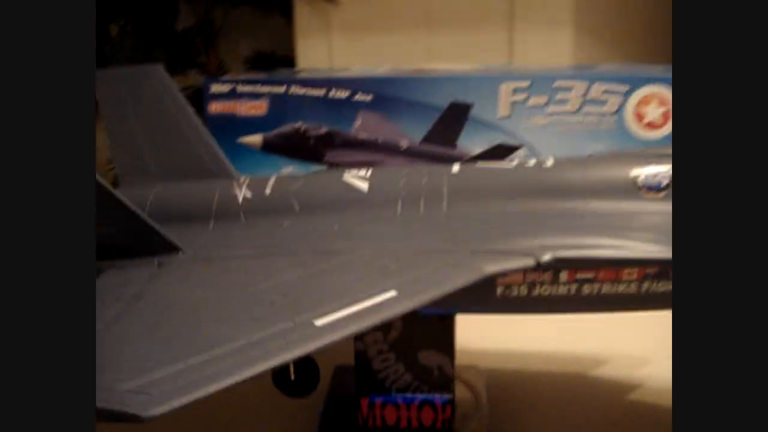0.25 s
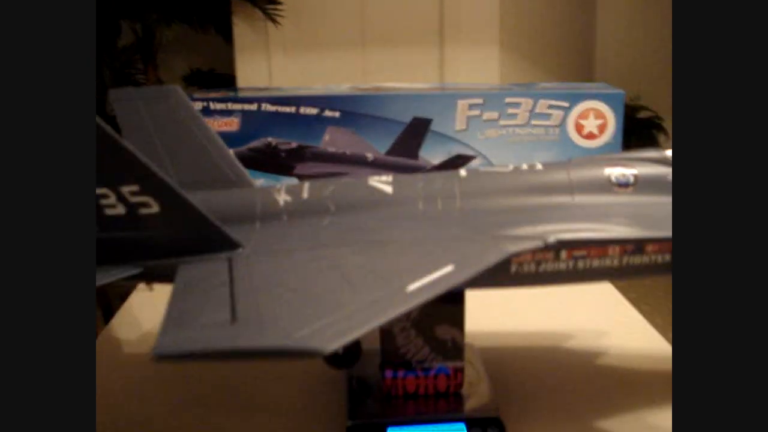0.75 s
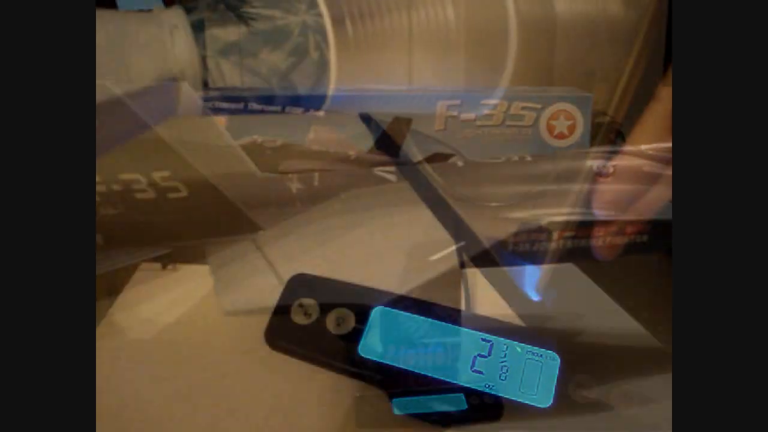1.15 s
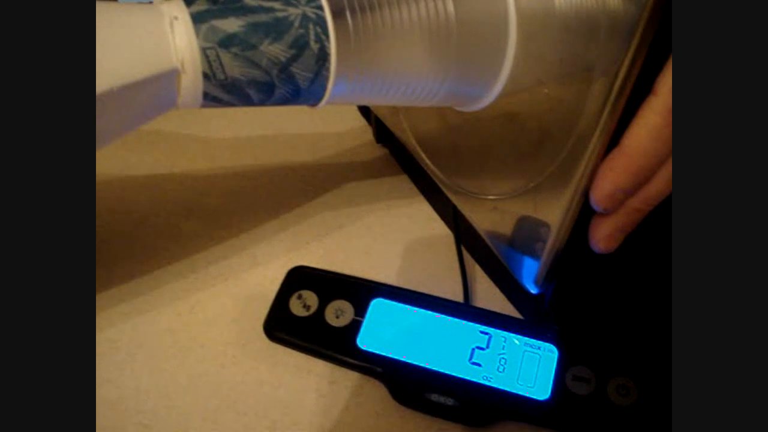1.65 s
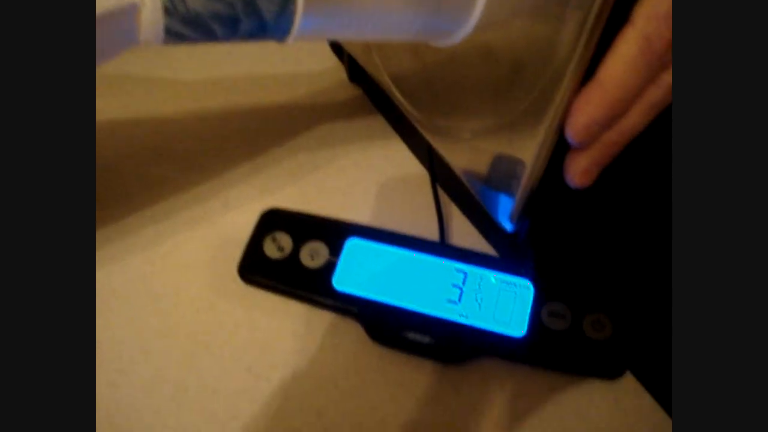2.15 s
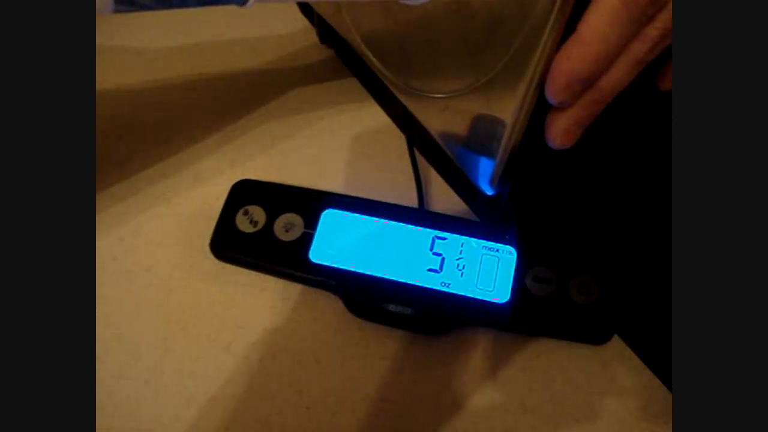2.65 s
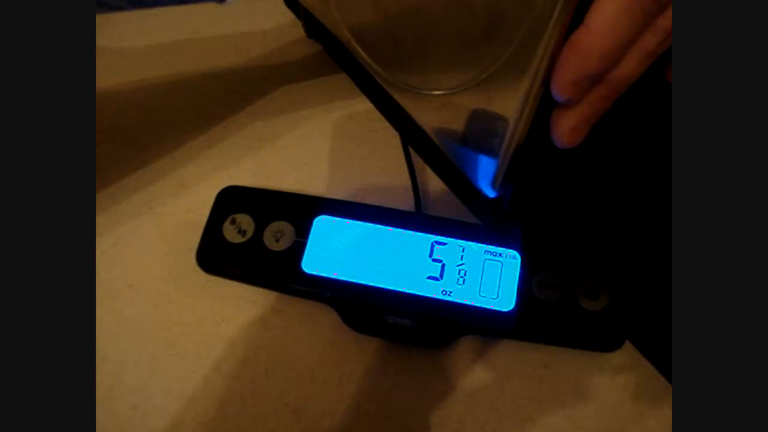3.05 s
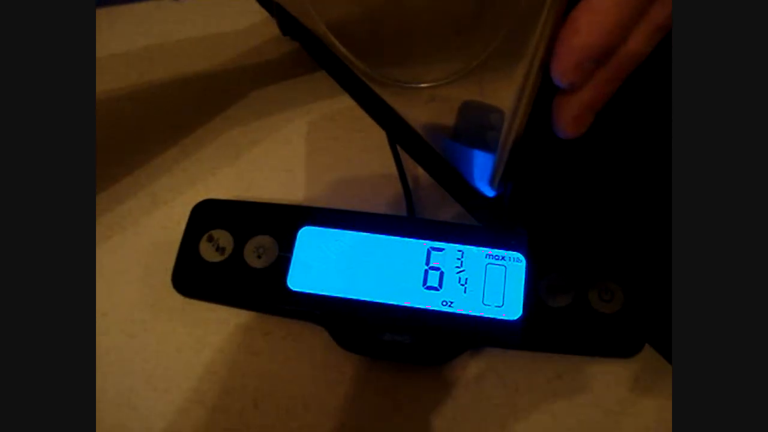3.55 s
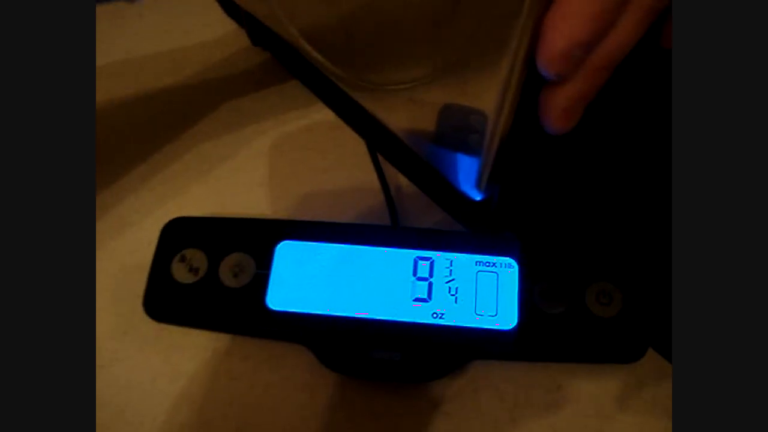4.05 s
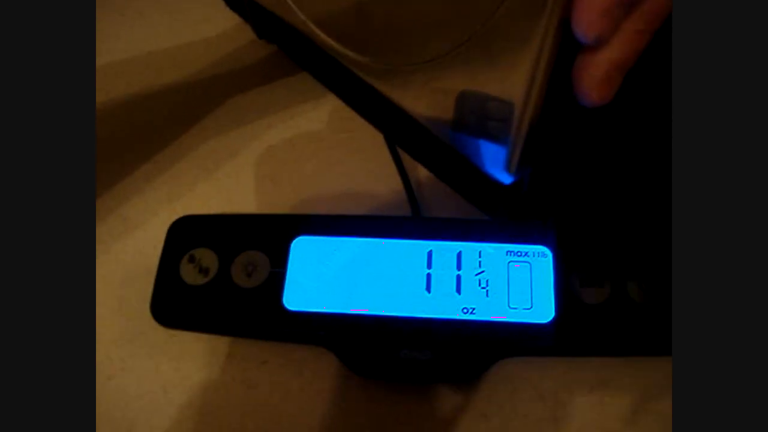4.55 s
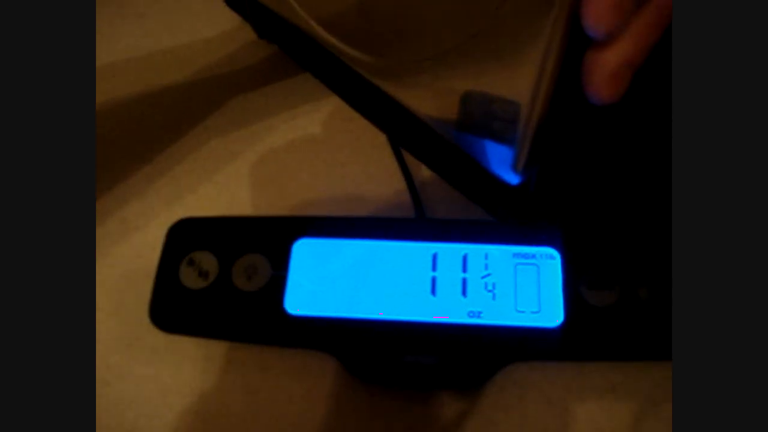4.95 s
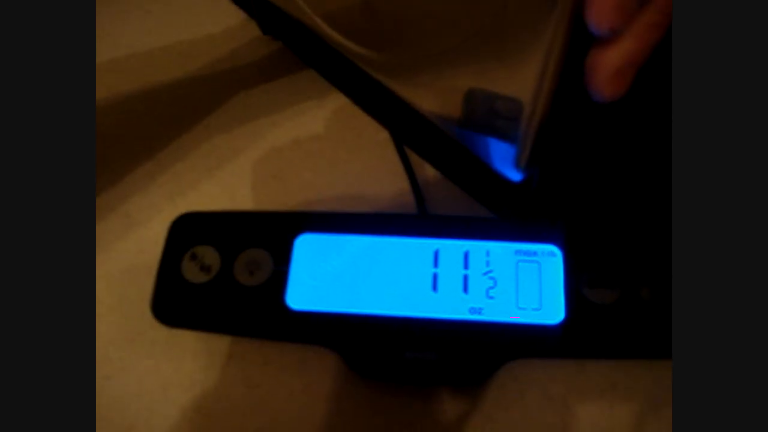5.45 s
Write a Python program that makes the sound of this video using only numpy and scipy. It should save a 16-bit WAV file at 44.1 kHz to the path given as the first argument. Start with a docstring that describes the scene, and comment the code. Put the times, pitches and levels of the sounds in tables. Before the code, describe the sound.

For the first 0.9 seconds there is quiet, slightly hollow room tone with a dozen tiny dry plastic ticks, mostly between 0.05 and 0.6 s, and a sharper downward-chirping snap at 0.4 s. More ticks near 0.9 s lead into a fade, with a soft low bump around 1.1 s, as an already running small electric ducted fan replaces the room by 1.5 s. A hum near 200 turns per second sits beneath a blade whine around 1.6 kHz and higher motor tones. It holds briefly, then climbs quickly from 1.8 to 2.5 s and continues in uneven steps, with another clear jump near 4.3 s and a last rise after 5.4 s, ending at 5.7 s over twice its starting pitch. Gusty roar, hiss and fine sizzle accompany it; the roar thins later. Faint fixed high tones come and go. Close, with slight room reflections, identical channels, little above 10 kHz.

```python
"""Indoors, close to a test stand that holds a small electric ducted fan; both channels carry the same sound.
A quiet room has a few handling ticks and one sharper click; then the running fan fades in and climbs in steps.
The rotor hums at its turning rate, blades and motor whine at multiples of it, and shaped noise makes the air.
Two thin high tones: one near 7.6 kHz that comes and goes, and one near 10 kHz only while the fan turns slowly."""
import sys
import numpy as np
from scipy import signal
from scipy.fft import rfft, irfft
from scipy.io import wavfile

SR = 44100
rng = np.random.default_rng(int(sys.argv[2]) if len(sys.argv) > 2 else 0)


def store_wav(level_fs):
    """Save 16-bit WAV to argv[1]."""
    pcm = np.round(np.clip(np.atleast_2d(level_fs), -1, 1) * 32767)
    wavfile.write(sys.argv[1], SR, pcm.T.astype(np.int16))


N = 251370  # length in samples

# Noise spectra are relative: each noise is scaled to an rms of 1 before its own level is applied.
# Ring tables give t60_s, the time a ring takes to fall by 60 dB.

# --- quiet room, ticks and click
# Colour of the room tone: pitch_hz, level_db (per Hz)
ROOM_SPECTRUM = [(18, -57.5), (30, -22.5), (49, -15.5), (153, -13.5), (249, -6.5), (333, -11.5),
                 (385, -5.5), (503, -14.5), (779, -14.5), (970, -19), (5320, -28), (5860, -26),
                 (10000, -36), (13000, -82), (22000, -120)]
# Colour of the low handling rumble: pitch_hz, level_db (per Hz)
RUMBLE_SPECTRUM = [(22, -3), (60, -12.0), (120, -10), (400, -58.5)]
# Soft bumps in the rumble that swell and die away: middle_s, level_db, half_length_s
RUMBLE_BUMPS = [(1.11, -55, 0.091), (2.24, -70, 0.06), (2.95, -74, 0.07), (4.23, -68, 0.072),
                (5.68, -72, 0.06)]
# Handling ticks: start_s, level_db (each ring adds its own level to this)
HANDLING_TICKS = [(0.073, -46), (0.156, -46), (0.324, -41), (0.3581, -43), (0.4343, -47), (0.456, -43),
                  (0.5064, -45), (0.5736, -46.5), (0.5903, -41), (0.892, -38.5), (0.9394, -47),
                  (0.958, -44)]
# Rings of the small case that is touched: pitch_hz, level_db, t60_s
TICK_RINGS = [(3350, -2.5, 0.0056), (4780, -1, 0.015), (5750, -0.5, 0.0068), (6900, -9.5, .003)]
# Colour of the scratching: pitch_hz, level_db (per Hz)
SCRATCH_SPECTRUM = [(2000, -13), (5500, -3), (7500, 4), (10000, -18)]
# Hollow body under the sharper click: pitch_hz, level_db, t60_s
CLICK_RINGS = [(1540, -5.5, 0.035), (2400, -14, .012), (4350, 7, 0.0089)]

# --- rotor: an "order" is a multiple of the shaft's turning rate
# How fast the fan turns as the throttle is opened in steps: time_s, turns_per_s
SHAFT_SPEED = [(0.9, 178.9), (1.105, 192.7), (1.272, 198.8), (1.59, 203.5), (1.763, 203.2), (1.92, 218.9),
               (2.191, 234.0), (2.413, 277.7), (2.511, 289.5), (3.032, 315.8), (3.213, 331.8),
               (3.457, 337.7), (3.739, 359.7), (4.017, 371.1), (4.447, 415.4), (4.745, 419.8),
               (5.041, 430.3), (5.433, 433.7), (5.7, 470.5)]
# Tone at the shaft rate, swelling and sinking as it climbs: time_s, level_db
SHAFT_TONE_LEVEL = [(1.0, -30.2), (1.29, -46), (1.51, -37.5), (2.08, -40.5), (2.26, -32), (2.63, -47),
                    (2.81, -36.5), (3.38, -34.5), (3.56, -41), (3.69, -32.5), (4.1, -40.0), (4.27, -29),
                    (4.39, -39), (4.59, -32), (4.94, -37.7), (5.3, -30), (5.7, -35)]
# Overtones of the hum: order
HUM_OVERTONES = (2, 3, 4, 5, 6, 7)
# Their levels at the middle speed, one row each: level_db, rise_db (per doubling of speed)
HUM_OVERTONE_LEVELS = [(-43, 11.5), (-42.5, 0), (-45, 4), (-51, -4), (-53.5, -11.5), (-61, -1)]
# Peaks and dips of duct and stand that the overtones glide through: pitch_hz, level_db
STAND_RESPONSE = [(400, -8), (452, 6), (545, -8), (605, 3), (665, 0), (730, 5), (888, -8.5), (1010, 2.5),
                  (1310, -4), (1385, 4.5), (1600, 0), (1740, -7.5), (2370, 6.5), (2520, 16.5), (3200, 11)]
# Speeds where all overtones swell or sink together: turns_per_s, level_db, half_width_turns_per_s
SWELL_SPEEDS = [(208.7, 4, 7.4), (301, 5, 41), (327.8, -6, 4.6), (378, -4, 7.6), (394.5, 3, 6.1),
                (458, 5, 30)]
# Rotor whirling in its bearing play, at odd multiples of half the shaft rate: order
HALF_ORDERS = (1.5, 2.5, 3.5, 4.5, 5.5)
# Level of each half order: time_s, level_db
WHIRL_LEVEL = [(1.5, -53.5), (2.1, -58), (2.8, -50.5), (3.4, -54), (4.2, -60), (5.7, -75)]

# --- blades, motor and thin high tones
# Blade tone, a fainter tone just above it, and the blade tone's second and third harmonics: order
BLADE_TONES = (8, 9, 16, 24)
# Their levels at the middle speed, one row each: level_db, rise_db (per doubling of speed)
BLADE_TONE_LEVELS = [(-34.5, 0.5), (-57, 16), (-45.5, 5), (-53, 1.5)]
# How well the duct lets the blade tones out: pitch_hz, level_db
DUCT_PEAKS = [(1520, 0), (1720, -20), (1950, -3.5), (2400, -2.5), (2950, 3), (3450, 0.5), (3800, -3.5),
              (4600, 5.5), (5300, -9.5), (6000, 0), (6800, 3), (7600, -4.5), (10000, -17.5)]
# Magnetic whine of the motor and its octave: order
MOTOR_TONES = (18, 36)
# Their levels at the middle speed, one row each: level_db, rise_db (per doubling of speed)
MOTOR_TONE_LEVELS = [(-39.5, 0), (-42.5, -2)]
# How the motor casing rings, with peaks near 3.6, 4.5 and 7 kHz: pitch_hz, level_db
CASING_PEAKS = [(3300, -4), (3620, 5.5), (4100, -3), (4550, -2), (5200, -15), (6200, -18), (7050, -3),
                (7500, -20.5), (9500, -28)]
# Two thin high tones, the lower and the upper: pitch_hz
THIN_TONES_HZ = (7577, 9990)
# The lower thin tone, which comes and goes: time_s, level_db
LOWER_TONE_LEVEL = [(1.8, -63), (2.4, -66), (2.75, -48), (3.3, -55), (3.52, -49), (4.6, -58), (5.7, -60)]

# --- rushing air
# Colour of the exhaust roar: pitch_hz, level_db (per Hz)
ROAR_SPECTRUM = [(60, -41), (130, -19.5), (200, -10), (260, -8.5), (380, -8.5), (520, -7), (760, 3),
                 (980, -2), (1350, 4), (1750, -6.5), (2400, 0), (4000, -14.5), (9000, -58)]
# Exhaust roar before its gusts: time_s, level_db
ROAR_STRENGTH = [(1.0, -33), (1.8, -37.5), (1.95, -33.5), (2.8, -33.5), (3.7, -41), (4.15, -40.5),
                 (4.5, -50.5), (5.1, -47.5), (5.7, -42)]
# Colour of the blade hiss: pitch_hz, level_db (per Hz)
HISS_SPECTRUM = [(150, -18.5), (400, -17.5), (1000, -12.5), (1500, -9), (1950, -20), (2300, -9),
                 (2750, 1.5), (3300, -1.5), (4000, -7), (5500, -29)]
# Colour of the fine sizzle off the blade tips: pitch_hz, level_db (per Hz)
SIZZLE_SPECTRUM = [(2500, -33), (3900, -0.5), (4900, 4), (5900, -1), (6800, 1.5), (7500, -1.5), (8200, -9),
                   (9000, -9), (10000, -26.5)]

# --- single settings
ROOM_DB, ROOM_UNDER_FAN_DB = -51, -67.5  # room tone before the fan and under it
RUMBLE_DB = -72  # steady part of the rumble
CLICK_S, CLICK_DB = 0.4056, -35.5  # time and starting level of the click's chirp
FADE_START_S, FADE_S = 0.91, 0.58  # the fan fades in as the room tone gives way
MID_SPEED = 300  # turns per s at which the speed-dependent levels are given
UPPER_TONE_DB, SLOW_SPEED = -59, 207  # upper thin tone is silent from this speed up (turns per s)
HISS_DB, HISS_RISE_DB = -37.5, 0.4  # before flicker; rise per doubling of speed
SIZZLE_DB, SIZZLE_RISE_DB = -40.5, -1.0  # likewise
CUTOFF_HZ = 10020  # almost nothing is heard above this


def from_db(db):
    """Turn decibels into a plain multiplier."""
    return 10 ** (np.asarray(db) / 20)


def rms_one(x):
    """Scale a signal to an average strength (rms) of 1."""
    return x / np.sqrt(np.mean(np.abs(x) ** 2) + 1e-20)


def in_time(rows):
    """Draw straight lines between a table's points in time, giving one curve for each later column."""
    time_s, *columns = np.transpose(rows)
    return [np.interp(np.arange(N) / SR, time_s, column) for column in columns]


def drift(rate_hz):
    """Slow random wandering of rms 1: noise whose parts faster than about rate_hz are weakened."""
    hz = np.arange(N // 2 + 1) * SR / N
    slowed = rfft(rng.standard_normal(N)) / (1 + (hz / rate_hz) ** 2)
    return rms_one(irfft(slowed, N))


def coloured_noise(spectrum):
    """Noise of rms 1 shaped by a spectrum, falling away below the spectrum's first pitch."""
    hz = np.arange(N // 2 + 1) * SR / N + 1e-6  # the tiny offset avoids log(0)
    pitch_hz, level_db = np.transpose(spectrum)
    gain = from_db(np.interp(np.log(hz), np.log(pitch_hz), level_db))
    gain = gain * np.minimum(hz / pitch_hz[0], 1) ** 2
    return rms_one(irfft(rfft(rng.standard_normal(N)) * gain, N))


def partial(angle, level_db, flutter, flutter_hz):
    """One tone of the given rms level, with its strength and phase shaken at random."""
    shake = 1 + flutter * (drift(flutter_hz) + 1j * drift(flutter_hz))
    start_phase = 2 * np.pi * rng.random()
    tone = np.real(shake * np.exp(1j * (angle + start_phase)))
    return from_db(level_db) * rms_one(tone)


def with_speed(turns, level_db, rise_db):
    """A level that changes by rise_db with each doubling of the speed."""
    return level_db + rise_db * np.log2(turns / MID_SPEED)


def line_db(turns, order, level, response):
    """Level of one order: it follows the speed, and the fixed peaks and dips its pitch passes through."""
    pitch_hz, peak_db = np.transpose(response)
    return with_speed(turns, *level) + np.interp(np.log(order * turns), np.log(pitch_hz), peak_db)


def strike(start_s, level_db, rings, spread_db):
    """One blow sets off several dying rings, each with a strength that spread_db can vary at random."""
    out = np.zeros(N)
    start, age = round(start_s * SR), np.arange(SR // 10) / SR
    for pitch_hz, ring_db, t60_s in rings:
        strength_db = level_db + ring_db + rng.normal(0, spread_db)
        fading = from_db(strength_db - 60 * age / t60_s)
        out[start:start + len(age)] += fading * np.sin(2 * np.pi * pitch_hz * age)
    return out


def room(x, t60, wet_db):
    """Scattered reflections, made as a dying noise tail, smear gliding tones and make them beat."""
    age = np.arange(SR // 2) / SR
    tail = rng.standard_normal(len(age)) * from_db(-60 * age / t60)
    tail = tail * (age > 0.004)  # reflections arrive a little after the direct sound
    reflections = signal.fftconvolve(x, tail / np.linalg.norm(tail))[:N]
    return x + from_db(wet_db) * reflections


def background(fade_in):
    """Room noise that gives way to the fan, plus a low handling rumble with soft bumps."""
    t = np.arange(N) / SR
    room_gain = from_db(ROOM_DB) * (1 - fade_in) + from_db(ROOM_UNDER_FAN_DB) * fade_in
    rumble_gain = from_db(RUMBLE_DB)
    for middle_s, level_db, half_s in RUMBLE_BUMPS:
        rumble_gain = rumble_gain + from_db(level_db) * np.exp(-((t - middle_s) / half_s) ** 2)
    return room_gain * coloured_noise(ROOM_SPECTRUM) + rumble_gain * coloured_noise(RUMBLE_SPECTRUM)


def ticks(scratch_db=-12, scratch_t60=0.028):
    """Light touches on a small plastic case: each rings briefly and scratches a little."""
    touches = sum(strike(s, db, TICK_RINGS, spread_db=3.5) for s, db in HANDLING_TICKS)
    scratch_gain, age = np.zeros(N), np.arange(SR // 10) / SR
    for start_s, level_db in HANDLING_TICKS:
        start = round(start_s * SR)
        scratch_gain[start:start + len(age)] += from_db(level_db + scratch_db - 60 * age / scratch_t60)
    return touches + scratch_gain * coloured_noise(SCRATCH_SPECTRUM)


def click(start_hz, end_hz, fall_s, t60):
    """A snap whose highs arrive first, so it chirps downward in milliseconds, over a short hollow ring."""
    age = np.maximum(np.arange(N) / SR - CLICK_S, 0)
    hz = end_hz + (start_hz - end_hz) * np.exp(-age / fall_s)
    angle = 2 * np.pi * np.cumsum(hz * (age > 0)) / SR  # stays at zero, so silent, before the click
    chirp = from_db(CLICK_DB - 60 * (age / t60) ** 2) * np.sin(angle)
    return chirp + strike(CLICK_S, CLICK_DB, CLICK_RINGS, spread_db=0.0)


def rotor_hum(shaft, turns):
    """Unbalance shakes the duct at the low shaft orders; bearing play adds half orders."""
    tone_db, = in_time(SHAFT_TONE_LEVEL)
    whirl_db, = in_time(WHIRL_LEVEL)
    tone = partial(shaft, tone_db, flutter=0.11, flutter_hz=21.0)
    swell_db = sum(db * np.exp(-((turns - speed) / width) ** 2) for speed, db, width in SWELL_SPEEDS)
    overtones = np.zeros(N)
    for order, level in zip(HUM_OVERTONES, HUM_OVERTONE_LEVELS):
        overtone_db = swell_db + line_db(turns, order, level, STAND_RESPONSE)
        overtones += partial(order * shaft, overtone_db, flutter=0.26, flutter_hz=10.6)
    whirl = sum(partial(order * shaft, whirl_db, flutter=0.5, flutter_hz=8.4) for order in HALF_ORDERS)
    return tone + room(overtones, t60=0.4, wet_db=-15.5) + whirl


def whine(shaft, turns):
    """Blade tones glide through the resonances of the duct, the motor's whine through those of its casing."""
    blades, motor = np.zeros(N), np.zeros(N)
    for order, level in zip(BLADE_TONES, BLADE_TONE_LEVELS):
        blade_db = line_db(turns, order, level, DUCT_PEAKS)
        blades += partial(order * shaft, blade_db, flutter=0.18, flutter_hz=65)
    for order, level in zip(MOTOR_TONES, MOTOR_TONE_LEVELS):
        motor_db = line_db(turns, order, level, CASING_PEAKS)
        motor += partial(order * shaft, motor_db, flutter=0.17, flutter_hz=30)
    return blades + motor


def thin_tones(turns):
    """Two thin high tones of fixed pitch: the lower comes and goes, the upper sounds only at low speed."""
    t = np.arange(N) / SR
    lower_db, = in_time(LOWER_TONE_LEVEL)
    lower_hz, upper_hz = THIN_TONES_HZ
    lower = partial(2 * np.pi * lower_hz * t, lower_db, flutter=0.15, flutter_hz=36)
    upper = partial(2 * np.pi * upper_hz * t, UPPER_TONE_DB, flutter=0.15, flutter_hz=36)
    return lower + upper * np.clip(SLOW_SPEED - turns, 0, 1)


def air(shaft, turns, gust_db, chop):
    """The exhaust roars and gusts; the noise off the blades flickers and swells once every turn."""
    roar_db, = in_time(ROAR_STRENGTH)
    roar = from_db(roar_db + gust_db * drift(7.8)) * coloured_noise(ROAR_SPECTRUM)
    hiss = from_db(with_speed(turns, HISS_DB, HISS_RISE_DB)) * coloured_noise(HISS_SPECTRUM)
    sizzle = from_db(with_speed(turns, SIZZLE_DB, SIZZLE_RISE_DB)) * coloured_noise(SIZZLE_SPECTRUM)
    flicker = from_db(0.96 * drift(45))
    once_per_turn = rms_one(1 + chop * np.cos(shaft))
    return roar + (hiss + sizzle) * flicker * once_per_turn


def scene():
    """One slightly unsteady shaft drives the hum, whine and air; room and handling sounds are added."""
    turns, = in_time(SHAFT_SPEED)
    unsteady_turns = turns * (1 + 0.00095 * drift(12.0))
    shaft = 2 * np.pi * np.cumsum(unsteady_turns) / SR  # angle of the shaft in radians
    fade_in = np.clip((np.arange(N) / SR - FADE_START_S) / FADE_S, 0, 1)

    handling = ticks() + click(start_hz=5460, end_hz=1200, fall_s=0.00344, t60=0.016)
    highs = room(whine(shaft, turns), t60=0.34, wet_db=-11.5) + thin_tones(turns)
    fan = rotor_hum(shaft, turns) + highs + air(shaft, turns, gust_db=1.5, chop=0.11)
    mono = background(fade_in) + handling + fade_in * fan
    return np.stack([mono, mono])


def record(dry):
    """A steep low-pass filter removes the top of the sound."""
    low_pass = signal.ellip(12, 0.1, 80, CUTOFF_HZ, fs=SR, output="sos")
    return signal.sosfilt(low_pass, dry)


dry = scene()
out = record(dry)
store_wav(out)
```